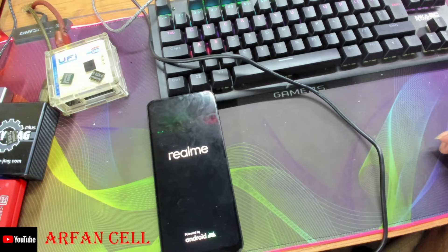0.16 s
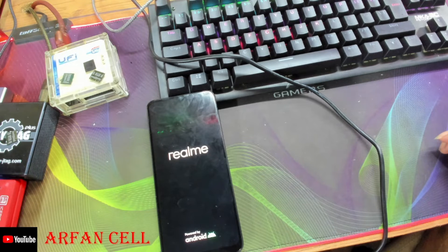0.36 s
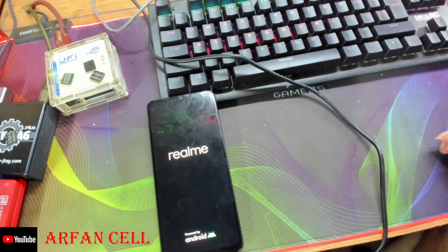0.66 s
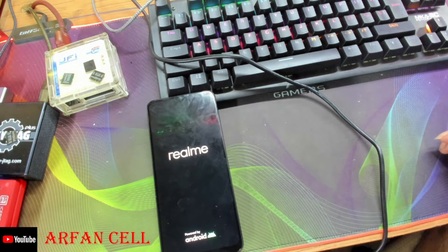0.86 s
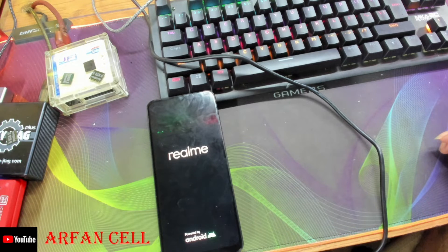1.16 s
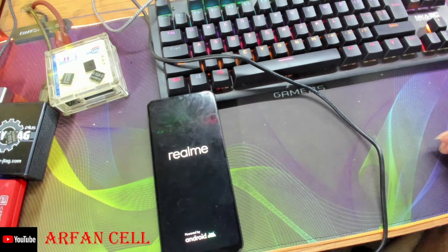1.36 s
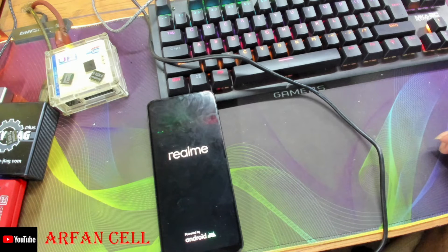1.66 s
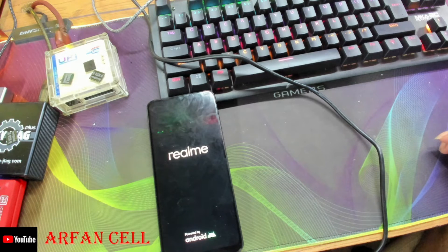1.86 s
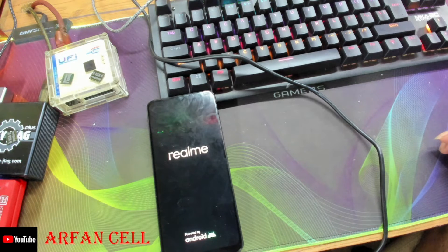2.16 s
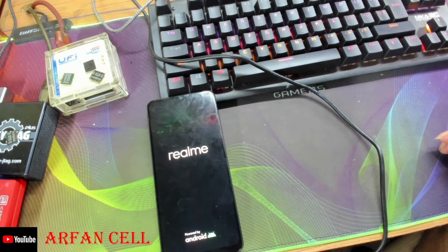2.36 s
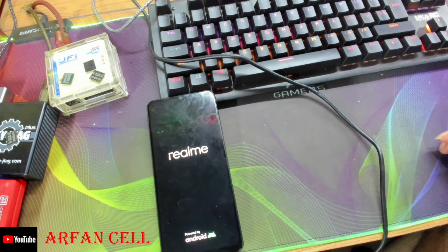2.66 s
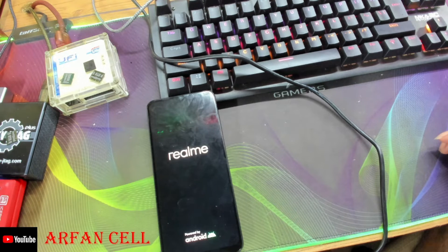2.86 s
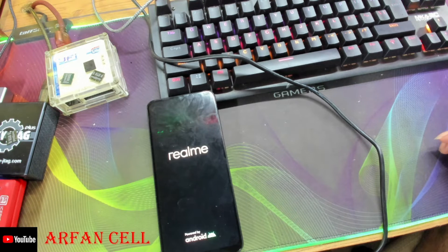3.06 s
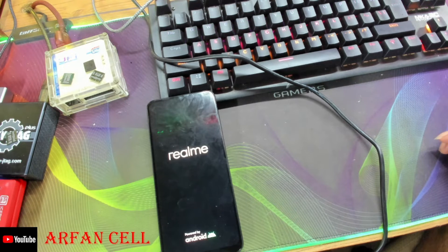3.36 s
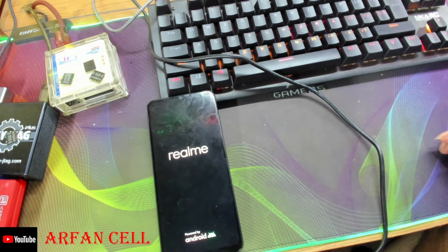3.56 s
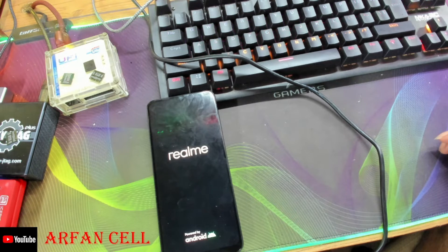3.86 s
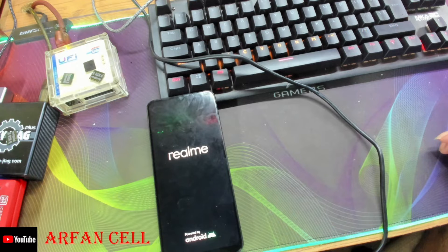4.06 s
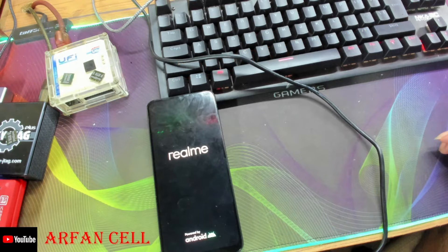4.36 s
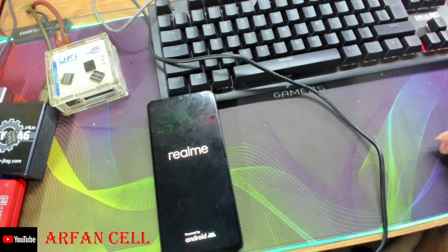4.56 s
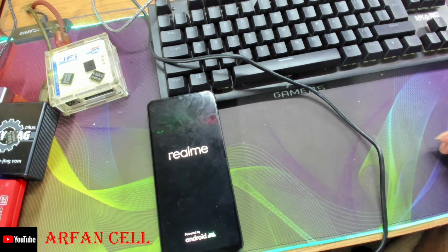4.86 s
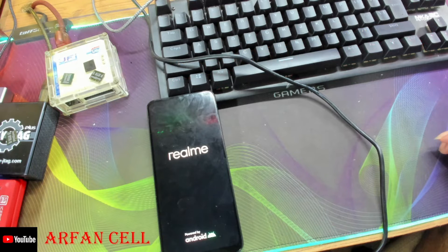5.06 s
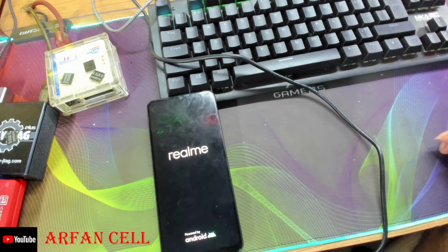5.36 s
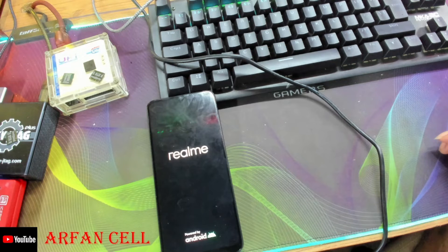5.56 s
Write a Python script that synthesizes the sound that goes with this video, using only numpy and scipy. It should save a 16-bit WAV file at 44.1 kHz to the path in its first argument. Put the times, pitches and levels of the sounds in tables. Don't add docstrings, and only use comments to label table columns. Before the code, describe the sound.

Steady mains-like humming and blowing air on an indoor workbench, broken by choppy dropouts, with dull low engine drone and wall thuds behind.

```python
import sys
import numpy as np
from scipy import signal
from scipy.fft import rfft, irfft
from scipy.io import wavfile
from scipy.ndimage import uniform_filter1d

SR = 44100
rng = np.random.default_rng(int(sys.argv[2]) if len(sys.argv) > 2 else 0)


def natural_amplitude(level_db):
    exponent = np.asarray(level_db, float) / 20
    return 10 ** exponent


def transcribe(u):
    v = np.clip(np.atleast_2d(u).T, -1, 1)
    q = np.round(v * 32767).astype(np.int16)
    wavfile.write(sys.argv[1], SR, q)


N = 251370
TIME = np.arange(N) / SR
AIR_DB, MOTOR_DB = -60, 16
SELF_NOISE_DB = -88


def unit(x):
    return x / np.sqrt(np.mean(x ** 2))


def shaped(gain):
    hz = np.arange(N // 2 + 1) * SR / N + 0.00072
    spectrum = rfft(rng.standard_normal(N))
    return unit(irfft(spectrum * gain(hz), N))


def resonance(hz, width):
    return shaped(lambda f: 1 / (1 + (2 * (f - hz) / width) ** 2))


def walk(rate):
    return shaped(lambda f: 1 / (1 + (f / rate) ** 4))


def tone(hz, flutter_db):
    turns = np.cumsum(hz) / SR + rng.random()
    return np.sqrt(2) * np.sin(2 * np.pi * turns) * natural_amplitude(flutter_db * walk(3.15))


def column(table, count):
    points = np.array(table)
    return np.interp(TIME, points[:, 0], points[:, count])


def motor():
    # (frequency [Hz], level [dB], wander [Hz])
    partials = [(119.75, 0.5, 0.14), (299, -14, 0.12), (320.9, -5.5, 0.5), (111.9, -13.5, 2.053),
                (58.4, -20, 3.24), (191, -17.5, 1.98)]
    return sum(natural_amplitude(db) * tone(hz + wander * walk(2.05), flutter_db=1.38) for hz, db, wander in partials)


def fan_air():
    # (frequency [Hz], density [dB per Hz])
    turbulence = [(28, 15.5), (55, 16), (82, 10), (330, 7.5), (420, 2), (700, -0.5), (1700, -9),
                  (1950, -19.5), (3000, -23), (4000, -24), (4150, -30.5), (7000, -32.5), (12000, -38.5),
                  (15600, -45.5)]
    # (frequency [Hz], width [Hz], level over air [dB])
    casing = [(660, 40, -5.5), (930, 44, -9.5), (1096, 52, -8), (3575, 370, -15), (3820, 120, -22)]
    hz, density = np.transpose(turbulence)
    flow = shaped(lambda f: natural_amplitude(np.interp(np.log(f), np.log(hz), density))) * natural_amplitude(15.5)
    return flow + sum(natural_amplitude(db) * resonance(f, width) for f, width, db in casing)


def supply_whine():
    # (frequency [Hz], level over air [dB])
    switching = [(11208, -33), (11268, -40), (11149, -45)]
    return sum(natural_amplitude(db) * tone(hz + 1.5 * walk(1.5), flutter_db=1.5) for hz, db in switching)


def engine_drone():
    # (time [s], frequency [Hz], level over air [dB])
    firing = [(0.0, 46.83, 1), (0.39, 45.64, 20.5), (1.2, 43.3, 15.5), (2.1, 42.55, 19.5),
              (2.5, 41.73, 8.5), (2.95, 41.46, 17.5), (3.14, 40.5, 13), (3.34, 41.45, -2), (3.54, 39.7, 17),
              (3.85, 39.9, 3.5), (4.13, 40.78, 14.5), (4.72, 41.3, 12.5), (5.31, 40.46, 1),
              (5.5, 40.77, 22.5), (5.7, 40, 13)]
    pitch = column(firing, count=1) + 0.18 * walk(1.7)
    return natural_amplitude(column(firing, count=2)) * tone(pitch, flutter_db=-1.8)


def wall_rumble():
    # (time [s], level over air [dB])
    passing = [(0, 6.5), (.9, -8), (1.12, -5), (1.17, 22.5), (1.3, 14.5), (2., 13), (2.4, 11.5), (2.7, -2),
               (2.92, 7), (3.1, 8), (4.3, 7.5), (4.6, 9.5), (5.7, 2)]
    # (frequency [Hz], width [Hz], level [dB])
    wall = [(156.1, 8.5, -4.5), (190, 36, -0.5), (217, 38, -5), (245, 25, -7)]
    ringing = unit(sum(natural_amplitude(db) * resonance(hz, width) for hz, width, db in wall))
    return natural_amplitude(column(passing, count=1)) * ringing


def panel_booms():
    # (time [s], frequency [Hz], level over air [dB], length [ms])
    shakes = [(0.264, 191, 17.5, 70), (.72, 154.8, 4, 400), (1.153, 183, 24, 20), (1.167, 243.8, 19.5, 64),
              (1.331, 185, 14, 35), (1.412, 183, 16, 110), (1.45, 238, 14, 49), (1.486, 191, 22, 73),
              (1.631, 191, 20, 47), (1.696, 199, 15, 77), (1.786, 248, 16, 96), (1.92, 241.7, 8, 190),
              (1.98, 182, 9, 50), (2.165, 212.8, 18.5, 123), (2.451, 193.7, 20, 38), (2.902, 190, 11, 100),
              (2.92, 245, 10, 130), (4.45, 190, 15.5, 130)]
    booms = np.zeros(N)
    for s, hz, db, ms in shakes:
        swell = np.exp(-0.5 * ((TIME - s) / (ms / 2800)) ** 2)
        booms += natural_amplitude(db + 1.5) * swell * np.sin(2 * np.pi * (hz * TIME + rng.random()))
    return booms


def chatter():
    # (first lull [s], last lull [s], first depth [dB], last depth [dB], width [ms])
    bouts = [(3.254, 3.335, 7, 9.5, 15), (4.525, 4.593, 15.5, 10.5, 13), (4.635, 4.768, 12, 12.5, 17.6),
             (4.918, 5.029, 16.5, 13, 10.9), (5.124, 5.232, 16.5, 9, 16.5), (5.505, 5.565, 7, 8, 14.3)]
    period_s = 0.039
    dips = []
    for first, last, first_db, last_db, ms in bouts:
        for s in np.linspace(first, last, round((last - first) / period_s) + 1):
            dips.append((s, np.interp(s, [first, last], [first_db, last_db]), ms))
    return dips


def lulls():
    # (time [s], depth [dB], width [ms])
    lone = [(0.036, 6, 15), (0.639, 5, 9.8), (1.02, 4.5, 5.6), (1.264, 5, 27), (1.602, 3, 17),
            (2.049, 4.5, 20), (2.146, 6.5, 13), (2.214, 2, 20), (2.431, 5.5, 16), (2.487, 18.5, 12),
            (2.581, 9.5, 15), (2.671, 5.5, 29), (2.764, 14.5, 22.4), (3.103, 9.5, 21), (3.174, 7, 33),
            (3.39, 3.5, 60), (3.483, 6, 23), (3.654, 3, 34), (3.787, 8.5, 27), (3.919, 13.5, 18.6),
            (4.053, 11.5, 43), (4.151, 10.5, 22), (4.286, 7, 17.2), (4.488, 7.5, 8), (4.799, 8, 18.4),
            (4.867, 9, 23.5), (5.075, 5.5, 20), (5.361, 5.5, 30), (5.456, 10, 68), (5.597, 10.5, 19.5)]
    lull = np.zeros(N)
    for s, depth, ms in list(lone) + chatter():
        near = slice(max(int((s - 0.1) * SR), 0), int((s + 0.1) * SR))
        spread = ms * np.where(TIME[near] < s, 1.35, 0.6) / 2400
        lull[near] += depth * np.exp(-0.5 * np.abs((TIME[near] - s) / spread) ** 2.03)
    return lull


def scene():
    bench = natural_amplitude(MOTOR_DB) * motor() + fan_air() + supply_whine()
    room = bench + engine_drone() + wall_rumble() + panel_booms()
    bass = signal.sosfiltfilt(signal.butter(2, 420, fs=SR, output="sos"), room)
    cancelling = natural_amplitude(-0.45 * uniform_filter1d(lulls(), int(0.016 * SR)))
    return natural_amplitude(AIR_DB) * (room - bass + bass * cancelling)[None]


def smooth(x, ms):
    pole = np.exp(-1000 / (ms * SR))
    return signal.lfilter([1 - pole], [1, -pole], x)


def gate_db(x):
    # (time [s], gain [dB])
    slow_opening = [(0.0, -1.5), (0.15, 0.5), (0.8, 0.5), (1.1, 2.5), (1.5, 1), (1.9, 2.5), (2.4, 0),
                    (3.0, 1.5), (3.15, -2.5), (3.3, -1.5), (3.6, -0.5), (4.22, 0.5), (4.45, -1),
                    (4.65, -2.5), (4.8, -2.5), (5.05, -2.5), (5.27, -1), (5.7, 0)]
    fidget_db, fidget_hz = 4, 24.2
    fidget = fidget_db * np.tanh(np.maximum(walk(fidget_hz), 0) ** 2)
    opening = column(slow_opening, count=1) - lulls() - fidget
    heard = 10 * np.log10(smooth(x ** 2, ms=1.69) + 1e-12)
    ripple = np.clip(heard - uniform_filter1d(heard, int(0.021 * SR)), -15, 15)
    slope = np.clip(0.5 - 0.013 * opening, 0, 1.2)
    return opening + slope * ripple


def band_limit(x):
    return signal.sosfilt(signal.butter(12, 15620, fs=SR, output="sos"), x)


def record(dry):
    gated = dry * natural_amplitude(gate_db(dry[0]))
    hiss = natural_amplitude(SELF_NOISE_DB) * shaped(lambda f: 1 / (1 + (f / 12000) ** 4))
    return band_limit(gated + hiss)


dry = scene()
out = record(dry)
transcribe(out)
```